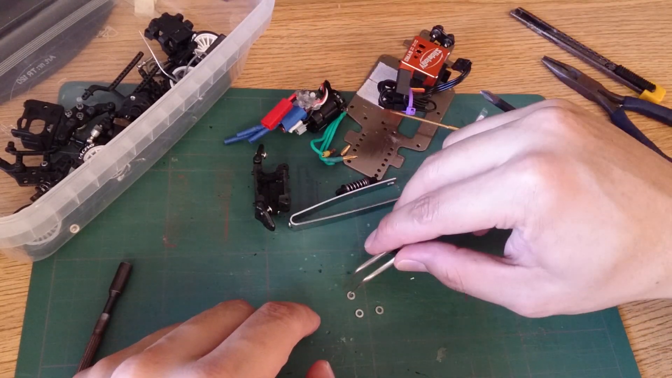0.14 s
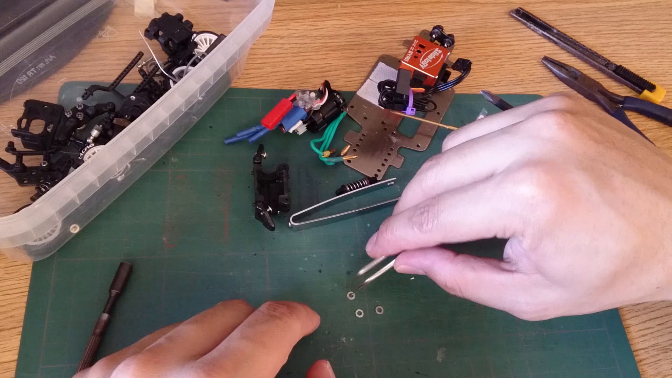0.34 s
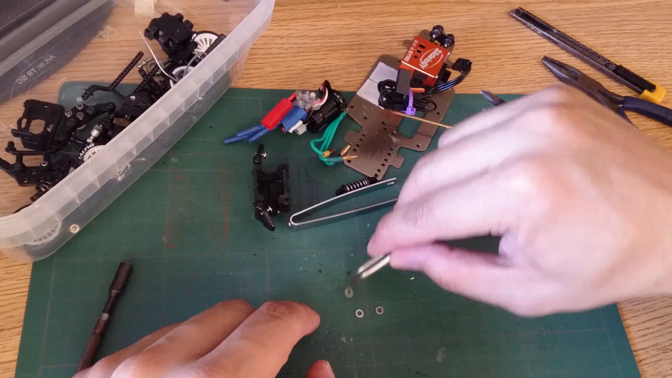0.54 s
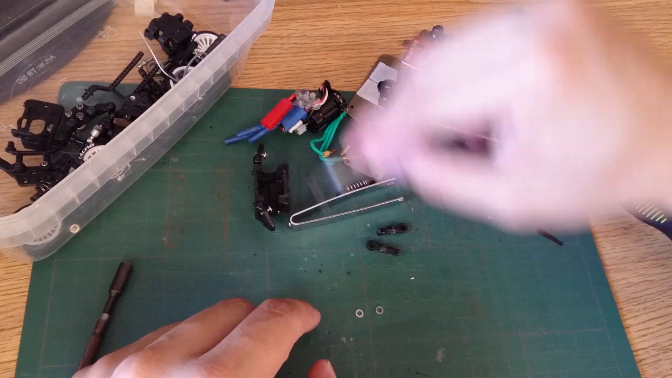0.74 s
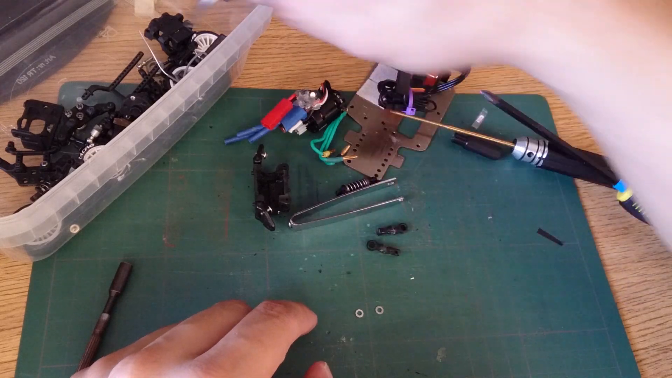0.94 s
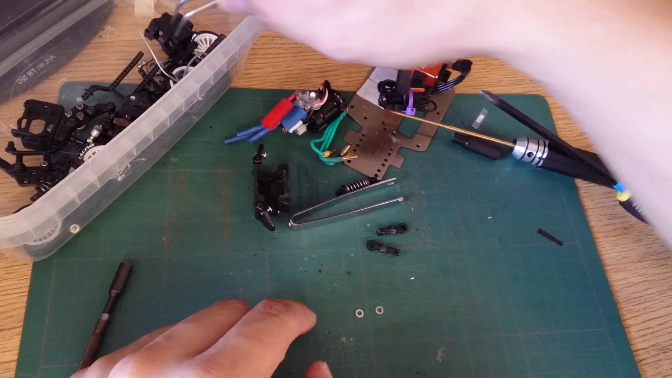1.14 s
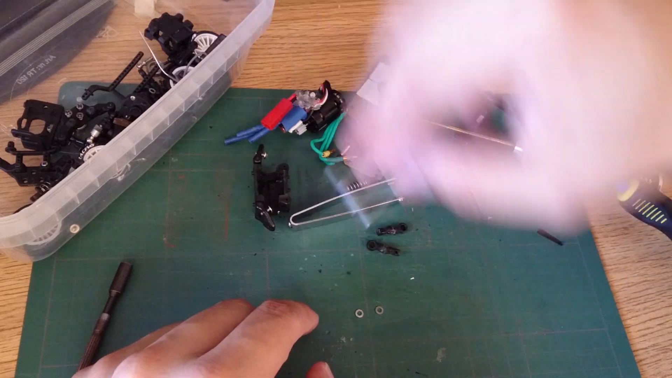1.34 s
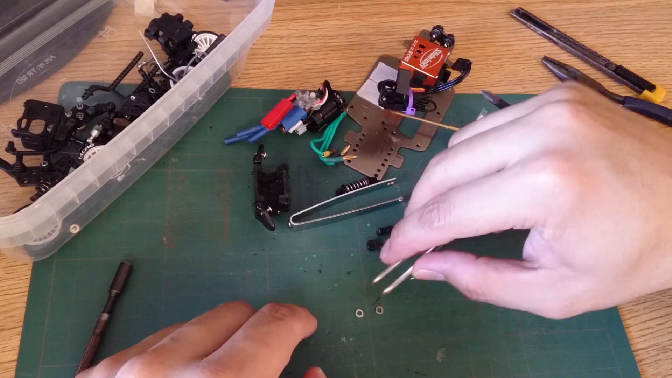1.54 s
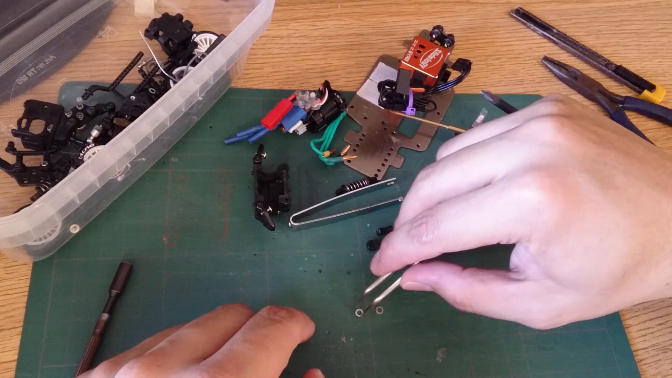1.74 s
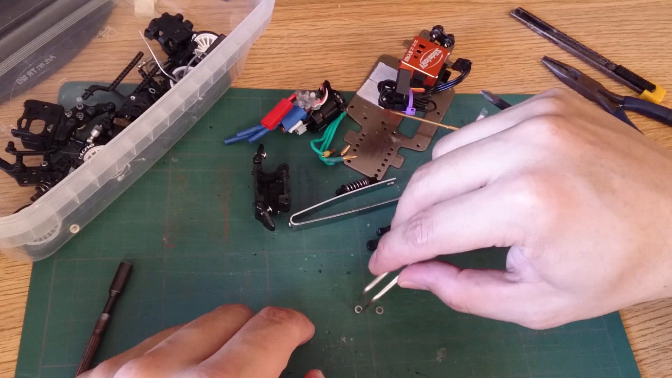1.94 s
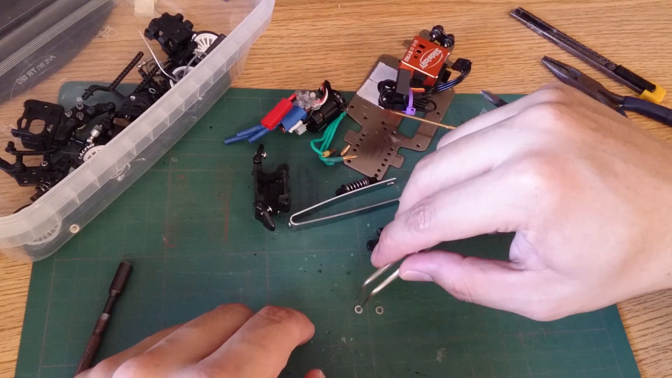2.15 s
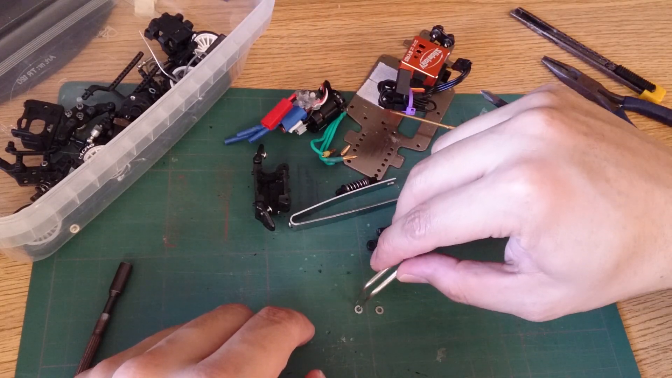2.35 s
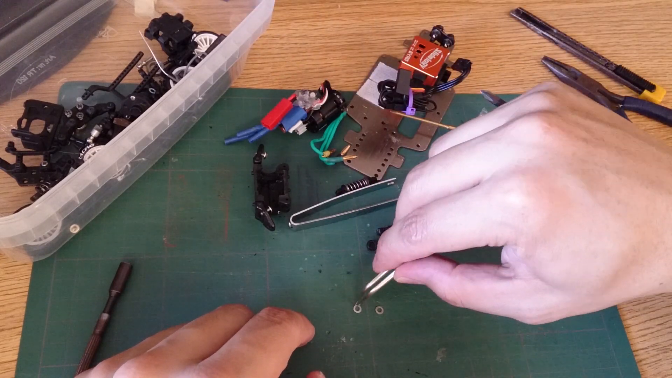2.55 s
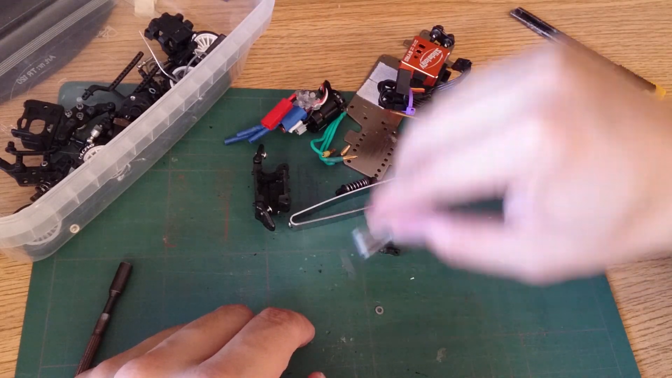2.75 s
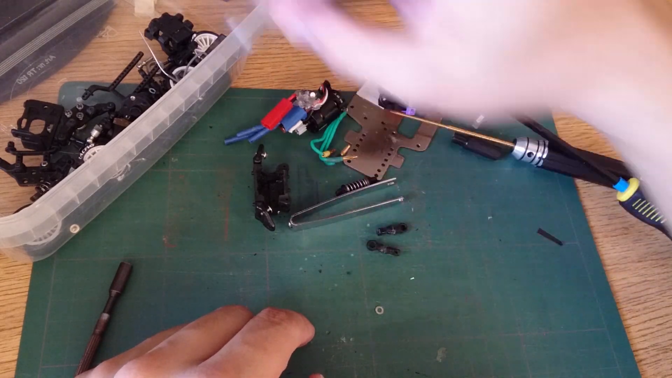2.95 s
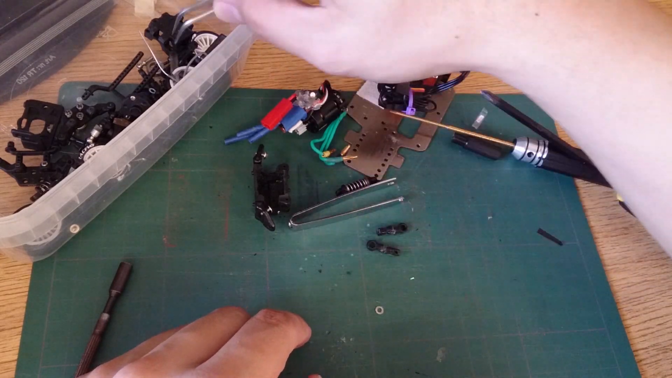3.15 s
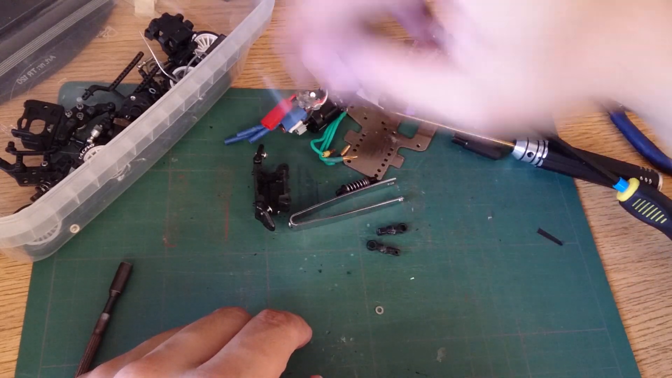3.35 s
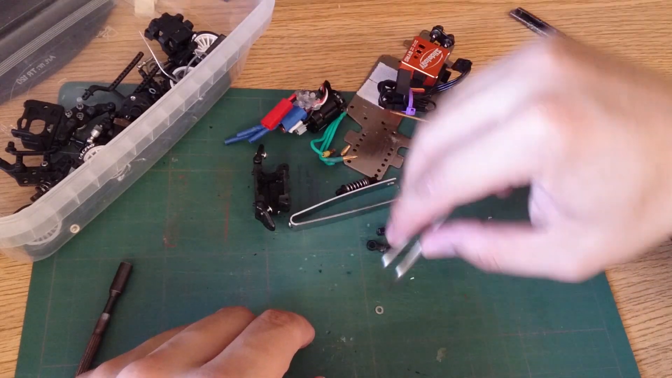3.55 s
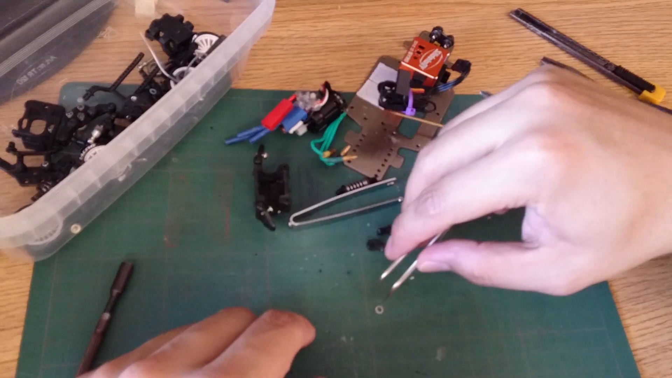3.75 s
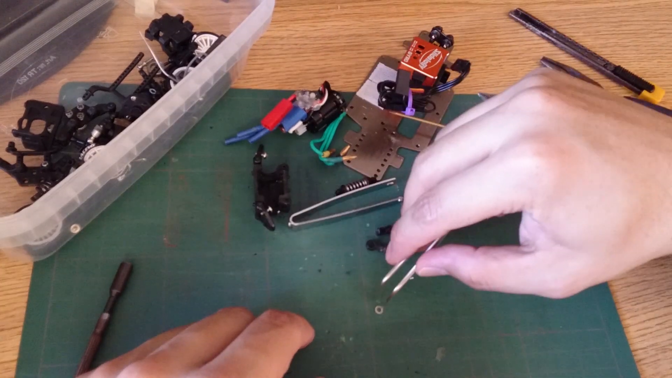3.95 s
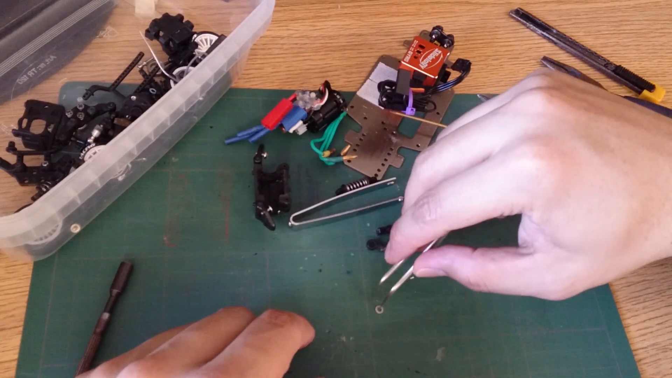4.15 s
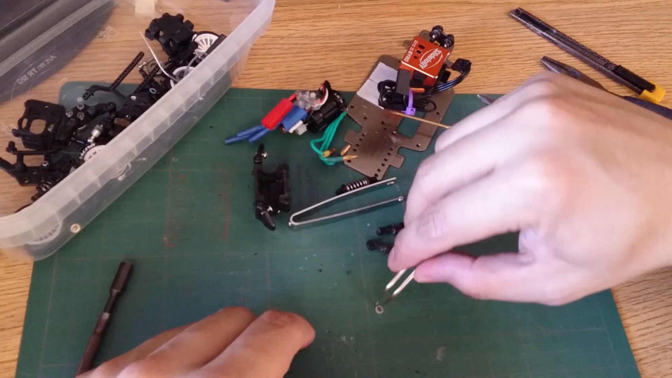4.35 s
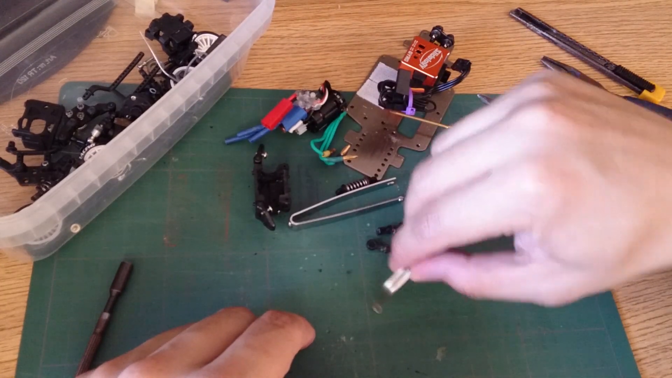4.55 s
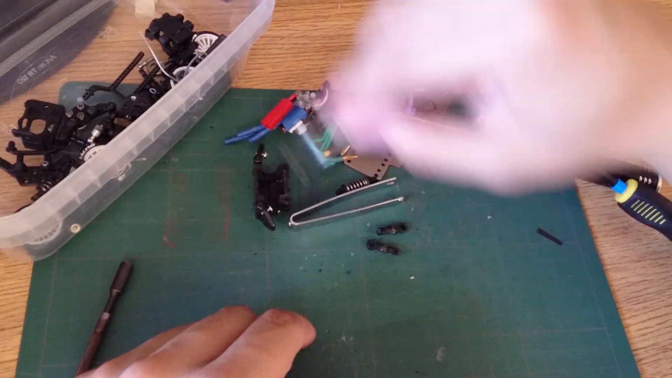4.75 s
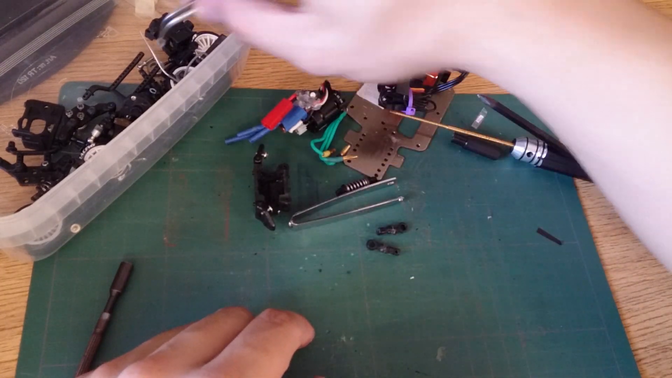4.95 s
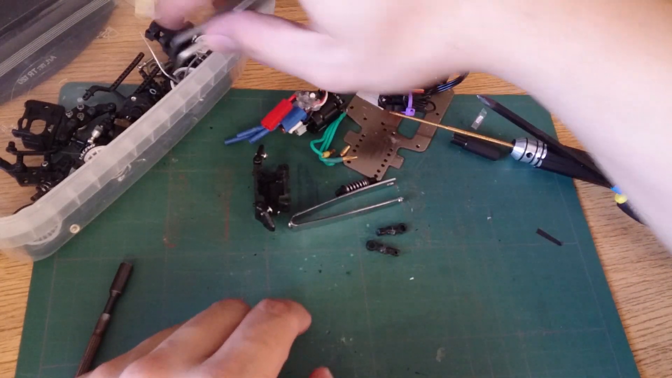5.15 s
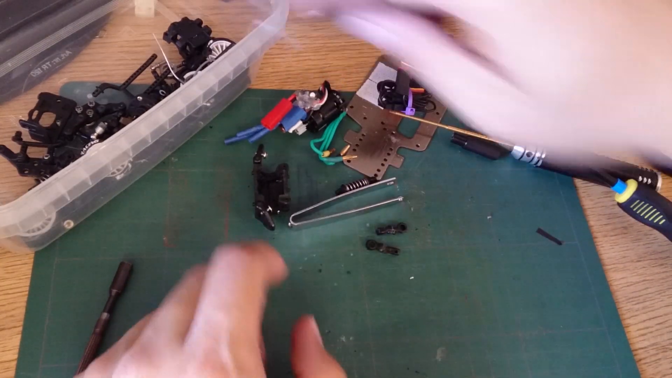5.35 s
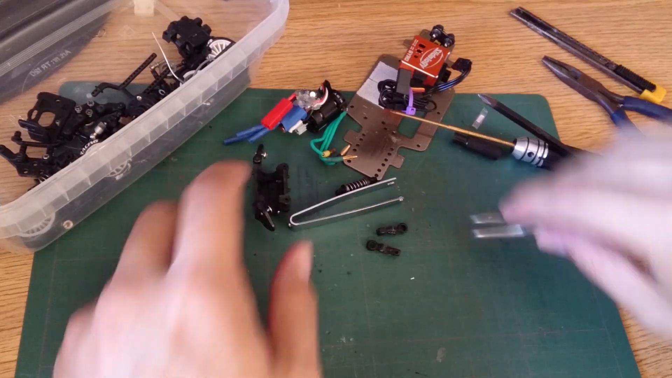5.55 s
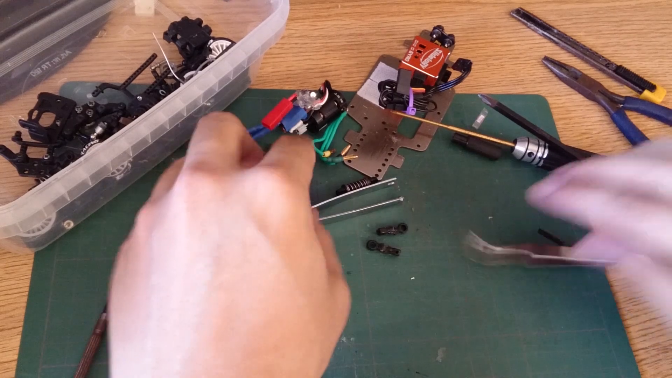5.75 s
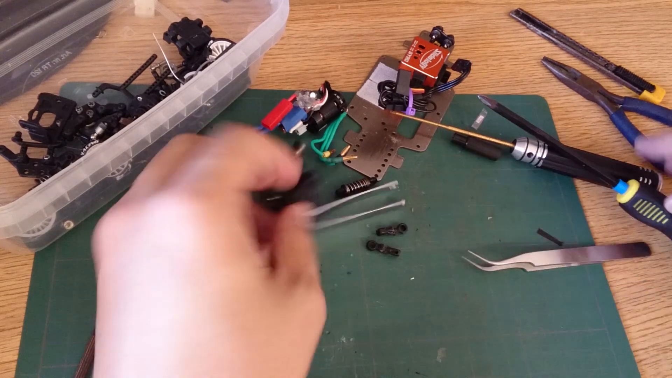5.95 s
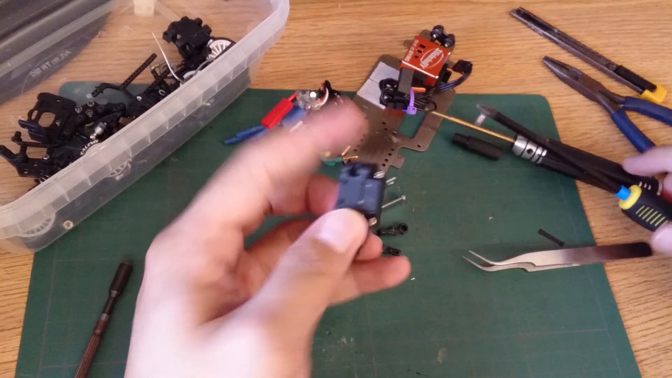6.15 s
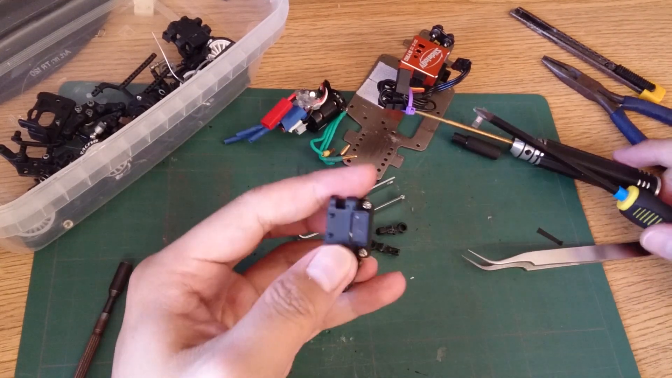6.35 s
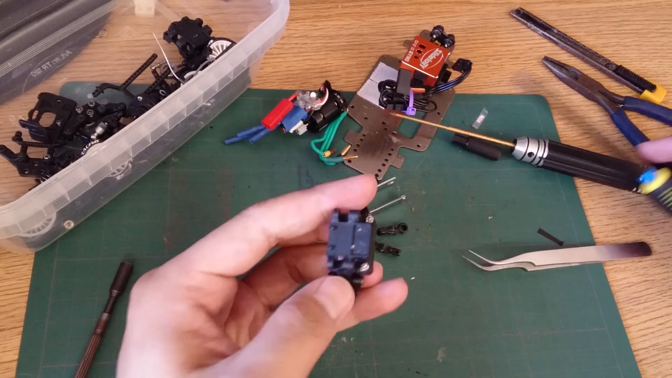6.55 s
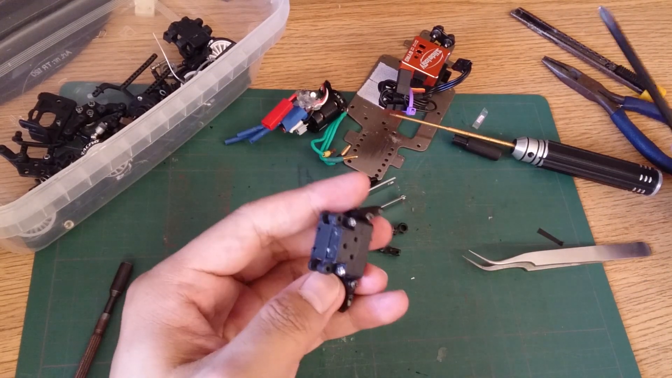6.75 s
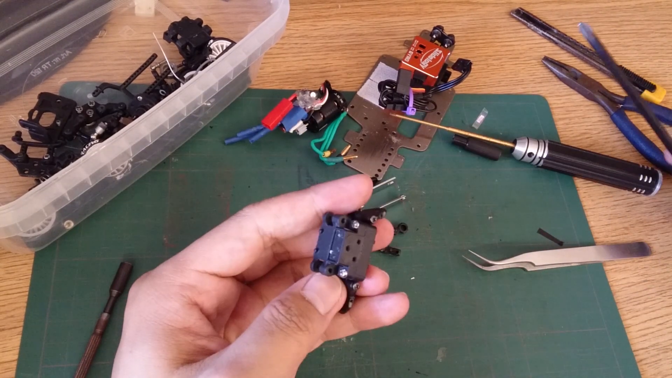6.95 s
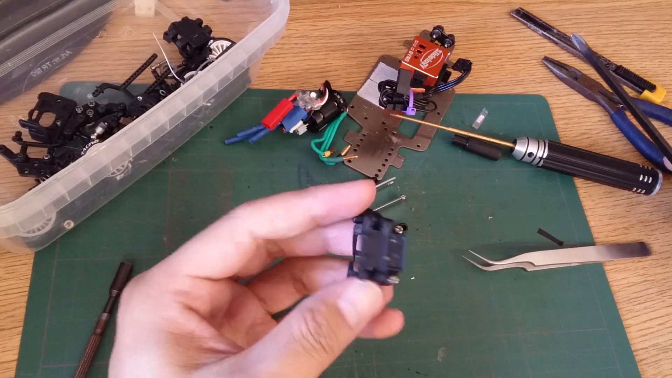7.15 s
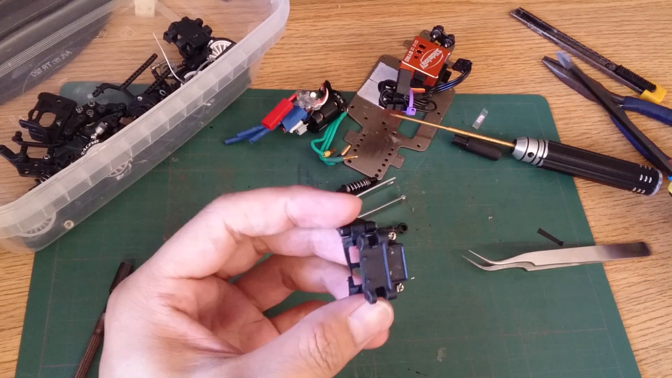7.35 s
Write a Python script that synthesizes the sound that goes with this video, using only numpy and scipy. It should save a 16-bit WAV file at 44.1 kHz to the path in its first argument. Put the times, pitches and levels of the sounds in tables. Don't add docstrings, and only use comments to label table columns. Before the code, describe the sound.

Small-parts work at a wooden desk, heard by a nearby camera microphone over steady airy ventilation. Isolated bright ticks and a brief plastic clack come first, with long near-silent gaps. Then a quick cluster of hard plastic knocks in a box, followed by the loudest event: tweezers landing with a sharp slap and bright metallic chatter. Faint skin and cloth rustle and muted handle knocks close it.

```python
import sys
import numpy as np
from scipy import signal
from scipy.fft import rfft, irfft
from scipy.io import wavfile

SR = 44100
rng = np.random.default_rng(int(sys.argv[2]) if len(sys.argv) > 2 else 0)


def field_ratio(decibels):
    return 10 ** (np.asarray(decibels, dtype=float) / 20)


def bounce(signal):
    frames = np.transpose(np.atleast_2d(signal))
    limited = np.clip(frames, -1, 1)
    pcm = np.round(limited * 32767).astype(np.int16)
    wavfile.write(sys.argv[1], SR, pcm)


N = 326844

# low_hz, high_hz, t60_s, trim_db
CONTACT_RANGES = [
    (3986, 7800, 0.017, 4),
    (796, 1860, 0.032, 3.5),
    (1800, 4000, 0.026, 2),
    (7800, 14400, 0.011, 5.5),
]
# start_s, level_db, time_to_silence_s
SHIVERS = [
    (1.293, -53, .08),
    (5.432, -39.5, .09),
    (5.888, -43, .21),
]


def rms_one(x):
    return x / np.sqrt(np.mean(x ** 2) + 1e-20)


def in_time(rows):
    return np.interp(np.arange(N) / SR, *np.transpose(rows))


def at_hz(points, hz):
    table_hz, values = np.transpose(points)
    return np.interp(np.log(hz), np.log(table_hz), values)


def add(out, start_s, sound):
    i = round(start_s * SR)
    out[i:i + len(sound)] += sound[:N - i]


def mode(hz, db, t60, rise=0.0001, choked=9.0):
    t = np.arange(round(t60 * SR)) / SR
    fall_db = -60 * t / t60 - 4000 * np.maximum(t - choked, 0)
    return field_ratio(db + fall_db) * (1 - np.exp(-t / rise)) * np.sin(2 * np.pi * hz * t)


def coloured(points):
    hz = np.maximum(np.arange(N // 2 + 1) * SR / N, 1)
    spectrum = rfft(rng.standard_normal(N)) * field_ratio(at_hz(points, hz))
    return rms_one(irfft(spectrum, N))


def resonate(x, hz, width_hz):
    r = np.exp(-np.pi * width_hz / SR)
    zeros = np.array([1, 0, -1]) * (1 - r * r) / 2
    poles = [1, -2 * r * np.cos(2 * np.pi * hz / SR), r * r]
    return signal.lfilter(zeros, poles, x)


def contacts(rows, ranges, law, ring_db, ring_width_hz, rise_s):
    out = np.zeros(N)
    t = np.arange(SR // 20) / SR
    chatter = rng.standard_normal((len(rows), len(t))) * (1 - np.exp(-t / rise_s))
    chatter[:, 8] += 3.0
    for (start_s, strength_db, *manner_db, ring_hz), white in zip(rows, chatter):
        levels_db = strength_db + np.array(law) @ [1, *manner_db]
        for level_db, (low_hz, high_hz, t60, trim_db) in zip(levels_db, ranges):
            band = signal.butter(4, [low_hz, high_hz], "band", fs=SR, output="sos")
            envelope = field_ratio(-60 * (t / t60) ** 1.17)
            burst = signal.sosfilt(band, white * envelope)
            if low_hz <= ring_hz < 1.03 * high_hz:
                burst += field_ratio(ring_db) * resonate(burst, ring_hz, ring_width_hz)
            add(out, start_s, field_ratio(level_db + trim_db) * burst / np.abs(burst).max())
    return out


def background():
    # time_s, level_db
    air_level = [(0.0, -62.2), (1.2, -61.8), (1.67, -63), (2.45, -62), (4.91, -61.5), (5.3, -62.5),
                 (6.9, -61.8), (7.41, -63)]
    # frequency_hz, density_db
    air_colour = [(18, -41), (54, -5), (150, -10), (330, -8), (430, -4.5), (751, -4), (2500, -14.5),
                  (4200, -85)]
    hiss_colour = [(1500, -34.5), (2500, 0.5), (4000, -3), (6500, -9.5), (7700, -17), (9200, -19),
                   (11900, -30), (12500, -45)]
    rustle_colour = [(60, -8), (130, 0), (400, 2), (900, -1.5), (2000, -16), (5000, -20), (9000, -43),
                     (12000, -75)]
    # pitch_hz, width_hz, level_db
    fan_tones = [(58, 2.8, -88.5), (129, 13, -82.5), (216.2, 36, -75)]
    # time_s, level_db
    rustle_level = [(5.3, -82), (5.6, -75), (6.2, -65.5), (6.6, -64.5), (6.85, -65.5), (7.1, -89)]
    wash_db, wash_s, wash_from_db = 4.0, .15, -50
    t = np.arange(N) / SR
    swell_db = np.zeros(N)
    for start_s, level_db, _ in SHIVERS:
        if level_db > wash_from_db:
            swell_db += wash_db * (t > start_s) * np.exp(-np.abs(t - start_s) / wash_s)
    noise = field_ratio(-2.37) * coloured(air_colour) + field_ratio(-10.0) * coloured(hiss_colour)
    out = field_ratio(in_time(air_level) + swell_db) * noise
    for hz, width_hz, level_db in fan_tones:
        out += field_ratio(level_db) * rms_one(resonate(rng.standard_normal(N), hz, width_hz))
    return out + field_ratio(in_time(rustle_level)) * coloured(rustle_colour)


def tip_ticks():
    # start_s, strength_db, spread_beyond_click_range_db, ring_hz
    touches = [(0.2639, -47, -28, 4630), (0.5874, -65, -10, 4100), (0.602, -62, -3, 5370),
               (1.2565, -44, -30, 6500), (1.3224, -49, -15, 5920), (1.3354, -62, -13, 4170),
               (1.387, -60, -9, 5450), (1.9393, -51.5, -29, 4800), (2.4186, -42.5, -33, 4820),
               (3.3598, -49.5, -21.5, 7360), (3.3834, -67, -3, 6540), (3.389, -54.5, -13, 5800),
               (3.407, -57, -9.5, 5740), (3.476, -54, -23, 7360), (3.5306, -57, -13, 6560),
               (3.5389, -61, -3, 5590), (3.5833, -57, -16, 7050), (3.59, -54, -15, 7200),
               (4.3989, -51.5, -37, 4740), (4.6094, -70, -6, 5200), (5.814, -57, -17, 4510),
               (6.143, -51, -27, 4720), (6.2282, -41.5, -23, 7050), (6.92, -64, -24, 7090)]
    # low_hz, high_hz, t60_s, trim_db
    tip_ranges = [
        (4120, 7800, 0.014, 2),
        (1000, 3200, 0.023, 4),
        (8000, 10900, 0.013, 10.6),
        (11500, 15300, .016, 14),
    ]
    # offset_db, share_of_spread
    tip_law = [(0, 0), (-1.0, .75), (-1.0, 1), (-3.0, 1.6)]
    return contacts(touches, tip_ranges, tip_law, ring_db=13.0, ring_width_hz=1000, rise_s=.0003)


def clacks():
    # start_s, pitch_hz, level_db
    stiff_parts = [(.602, 14300, -47), (0.265, 8900, -53), (1.2898, 1290, -25.5), (1.291, 3100, -33),
                   (1.291, 2200, -35), (1.296, 3500, -38), (1.355, 3500, -51), (3.539, 2200, -52),
                   (5.455, 3600, -33), (1.2905, 800, -58), (5.255, 3570, -35), (5.255, 3200, -39),
                   (5.254, 4800, -41), (5.253, 1310, -37), (5.318, 9000, -35), (5.319, 730, -40),
                   (5.32, 1920, -32), (5.445, 1600, -34), (5.446, 2600, -36), (5.4295, 3750, -30),
                   (5.4255, 1500, -37), (5.884, 3760, -25), (6.002, 4786, -38), (6.106, 4020, -50),
                   (5.954, 15700, -34), (5.9535, 3250, -23), (5.954, 5700, -18.5), (6.428, 2500, -42),
                   (6.725, 1940, -41.5), (6.902, 4600, -54)]
    longest_s, cycles = .012, 70
    out = np.zeros(N)
    for start_s, hz, level_db in stiff_parts:
        add(out, start_s, mode(hz, level_db, min(longest_s, cycles / hz), 0.00054))
    return out


def falling_parts():
    # start_s, strength_db, weight_db, hardness_db, ring_hz
    landings = [(1.2902, -38.5, -16, -17.5, 1330), (5.253, -43, -5.5, -7, 1220),
                (5.3175, -31, -28, -14.5, 1920), (5.3394, -52, -12, -7, 1910),
                (5.3726, -39, -12, -13, 4200), (5.3834, -45, -14, -24, 1880), (5.401, -61, -2, -8, 1930),
                (5.4271, -29, -5.5, -14.5, 1480), (5.4341, -30, -8, -13, 1370),
                (5.4515, -32, -5, -17, 1190), (5.462, -45, 6, -5, 1170), (5.4914, -54, -18, -12, 1240),
                (5.5029, -46, -21, -15, 2270)]
    # offset_db, share_of_weight, share_of_hardness
    part_law = [(0, 0, 0), (0, 1, 0), (-1.5, .55, 0), (0, 0, 1)]
    return contacts(landings, CONTACT_RANGES, part_law, ring_db=6.0, ring_width_hz=130, rise_s=0.00012)


def rattle(per_s):
    # frequency_hz, density_db
    parts_colour = [(150, -22), (350, -8), (700, 1), (1500, -6.5), (3500, 2.5), (6500, -6), (10000, -26),
                    (16000, -36)]
    rise_s, fall_db, bend = .006, 31, 2.0
    touches = (rng.random(N) < per_s / SR) * rng.exponential(1, N)
    gate = signal.lfilter([1], [1, -np.exp(-1 / (0.00069 * SR))], touches)
    shiver = np.zeros(N)
    for start_s, level_db, last_s in SHIVERS:
        t = np.maximum(np.arange(N) / SR - start_s + rise_s, 0)
        rise = np.minimum(t / rise_s, 1) ** 2
        shiver += rise * field_ratio(level_db - fall_db * (t / last_s) ** bend)
    return shiver * rms_one(gate * coloured(parts_colour))


def hollow_rings():
    # start_s, pitch_hz, level_db, t60_s
    hollow_bodies = [(1.298, 1310, -42, 0.036), (5.452, 1373, -32, .05), (5.455, 1230, -67, .07),
                     (5.428, 1950, -33, .03), (5.428, 560, -50.5, .07), (5.436, 710, -40.5, 0.067),
                     (5.453, 900, -47, 0.038), (5.883, 259, -51.5, 0.17), (5.762, 1440, -49, 0.086),
                     (5.884, 1090, -28.5, .08), (5.886, 1460, -31, 0.11), (5.883, 1880, -46, .05),
                     (5.884, 2250, -53, 0.06), (5.883, 2600, -37, 0.042), (5.885, 3020, -25, .05),
                     (5.885, 3430, -33, .05), (6.725, 845, -42, 0.06), (6.723, 1346, -46, 0.098),
                     (6.728, 4530, -58, 0.043), (6.917, 9500, -60, .015), (5.758, 700, -48, .03),
                     (5.758, 1150, -46, .03), (6.427, 950, -50, .04), (5.373, 4100, -38, .02),
                     (5.929, 3950, -29, .025)]
    out = np.zeros(N)
    for start_s, hz, level_db, t60 in hollow_bodies:
        add(out, start_s, mode(hz, level_db, t60, 0.00042))
    return out


def desk():
    # start_s, level_db
    blows = [
        (5.432, -54),
        (5.884, -49),
        (5.95, -69),
        (6.081, -74),
        (2.417, -67),
        (6.722, -61),
    ]
    # pitch_hz, level_db, t60_s
    desk_modes = [(59.3, -12, 0.99), (73, -8, 0.72), (78, -9, 0.27), (117, -4, 0.4), (154, 4, 0.12),
                  (221.6, -1, 0.26), (334, 6.5, 0.12), (443, 10.5, 0.09), (560, 12.5, 0.055),
                  (686, -5, 0.087)]
    out = np.zeros(N)
    spread_db = rng.normal(0, 3.5, (len(blows), len(desk_modes)))
    for (start_s, blow_db), own_db in zip(blows, spread_db):
        for (hz, level_db, t60), extra_db in zip(desk_modes, own_db):
            add(out, start_s, mode(hz, blow_db + level_db + extra_db, t60, 0.0021))
    return out


def dropped_tweezers():
    # start_s, strength_db, weight_db, hardness_db, ring_hz
    bounces = [(5.7574, -36, -14, -18, 1410), (5.8816, -32.5, 18, -12.5, 2420), (5.8864, -30, 3, -22, 2420),
               (5.9256, -24, -9, -16, 7000), (5.9321, -32, 0, -13, 3920), (5.9478, -47, 13, 2.5, 3330),
               (5.9535, -32, 3, 2, 6300), (5.9744, -31, -7, -9.5, 6290), (6.0001, -32.5, -3.5, -15, 4570),
               (6.0204, -36, -6, -2, 6300), (6.044, -42.5, -4, -19.5, 6500), (6.1055, -50, -3, -29, 4070)]
    # offset_db, share_of_weight, share_of_hardness
    steel_law = [(0, 0, 0), (-14.0, .9, 0), (0, 1, 0), (0, 0, 1)]
    return contacts(bounces, CONTACT_RANGES, steel_law, ring_db=3.0, ring_width_hz=300, rise_s=0.00043)


def mat_slap():
    # start_s, pitch_hz, level_db, t60_s
    slap_modes = [(5.8832, 2600, -6.5, .006), (5.8832, 3200, -12, .008), (5.8872, 2400, -17, .008),
                  (5.8818, 1350, -15, .008), (5.8845, 800, -28, .025), (5.887, 1450, -18, .012),
                  (5.884, 4400, -22, .008)]
    out = np.zeros(N)
    for start_s, hz, level_db, t60 in slap_modes:
        add(out, start_s, mode(hz, level_db, t60, .0002))
    return out


def ringing_steel():
    # pitch_hz, level_db, t60_s
    arm_modes = [(6374, -38, .3), (6795, -49, .4), (10440, -56, .3), (11050, -48, .4), (12450, -47, .06),
                 (14480, -58, .12)]
    joint_modes = [(8770, -48, .2), (9755, -54, .05), (11760, -70, .3), (14480, -56, .08)]
    # start_s, free_s, arms_db, arms_brightness_db_per_octave, joint_db
    flights = [
        (5.885, .033, -15, -8, 0),
        (5.926, .018, -24, 21, -10),
        (5.954, .028, 1, 0.5, -18),
        (6.01, .1, -10, -14, -40),
        (6.021, .06, -31, 23, -4),
    ]
    out = np.zeros(N)
    for start_s, free_s, arms_db, bright_db, joint_db in flights:
        for hz, level_db, t60 in arm_modes:
            tilt_db = bright_db * np.log2(hz / arm_modes[0][0])
            add(out, start_s, mode(hz, level_db + arms_db + tilt_db, t60, .001, free_s))
        for hz, level_db, t60 in joint_modes:
            add(out, start_s, mode(hz, level_db + joint_db, min(t60, 5 * free_s), .001, min(free_s, .035)))
    return out


def knocking_handles():
    # start_s, strength_db, weight_db, hardness_db, ring_hz
    knocks = [(6.4259, -66, 16, -22, 1500), (6.4444, -71, 18, -14, 895), (6.7241, -65, 19, -23, 830),
              (6.7394, -75, 27, -14, 845), (6.7904, -76, 17, -7, 860), (6.9015, -55, -4, -17, 1360)]
    # offset_db, share_of_weight, share_of_hardness
    handle_law = [(0, 0, 0), (0, 1, 0), (1.5, .35, 0), (0, 0, 1)]
    return contacts(knocks, CONTACT_RANGES, handle_law, ring_db=13.0, ring_width_hz=150, rise_s=0.00017)


def room(x):
    # frequency_hz, t60_s
    room_t60 = [(100, 0.68), (500, 0.54), (2000, 0.28), (6000, 0.26), (14000, 0.19)]
    # frequency_hz, level_db
    room_level = [(100, -34), (500, -42), (2000, -36.5), (6000, -34), (14000, -33.5)]
    t = np.arange(SR // 2) / SR
    white = rng.standard_normal((2, len(t)))
    tail = np.zeros(len(t))
    edges_hz = 70 * 2 ** np.arange(0, 8.1, .5)
    for k, (low_hz, high_hz) in enumerate(zip(edges_hz, edges_hz[1:])):
        sos = signal.butter(2, [low_hz, high_hz], "band", fs=SR, output="sos")
        band = signal.sosfilt(sos, white[k % 2])
        hz = np.sqrt(low_hz * high_hz)
        tail += band * field_ratio(at_hz(room_level, hz) - 60 * t / at_hz(room_t60, hz))
    build_up = 1 - np.exp(-(t / 0.0013) ** 2)
    return signal.fftconvolve(x, tail * build_up)[:N]


def microphone(x):
    # frequency_hz, level_db
    housing = [(20, -27), (70, 6), (6800, -2.5), (7700, -10), (8800, -1), (10500, -3.5), (12500, -9),
               (14500, 1.5)]
    size = 4096
    hz = np.maximum(np.arange(size // 2 + 1) * SR / size, 1)
    cepstrum = irfft(np.log(field_ratio(at_hz(housing, hz))))
    cepstrum[1:size // 2] *= 2
    cepstrum[size // 2 + 1:] = 0
    return signal.fftconvolve(x, irfft(np.exp(rfft(cepstrum))))[:N]


def scene():
    loose_and_stiff = clacks() + rattle(per_s=1500) + hollow_rings() + mat_slap()
    groups = [(tip_ticks(), .4), (falling_parts(), .75), (dropped_tweezers(), 1.05),
              (knocking_handles(), .9), (loose_and_stiff, .7)]
    steel = ringing_steel()
    out = background() + desk() + steel + room(.4 * steel)
    for hits, wet in groups:
        hits = microphone(hits)
        out += hits + wet * room(hits)
    return out[None, :]


def top_cut(x):
    return signal.sosfilt(signal.butter(12, 16200, fs=SR, output="sos"), x)


def record(dry):
    rumble_cut = signal.butter(2, 36, "high", fs=SR, output="sos")
    return top_cut(signal.sosfilt(rumble_cut, dry))


dry = scene()
out = record(dry)
bounce(out)
```